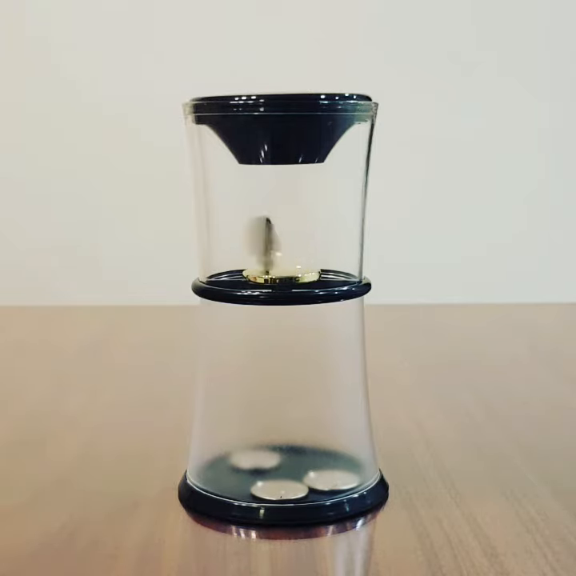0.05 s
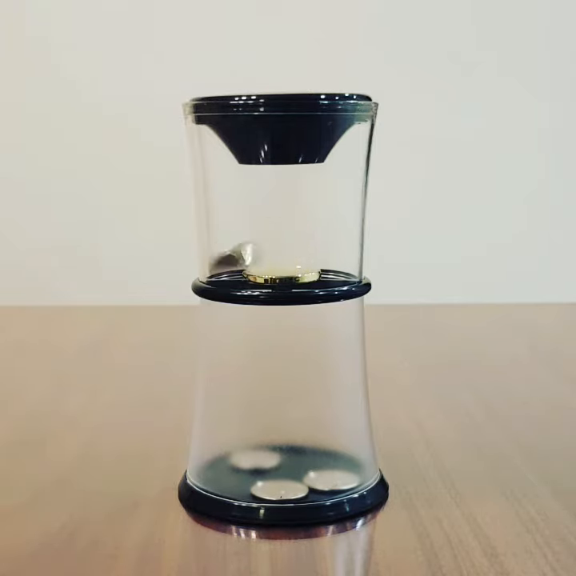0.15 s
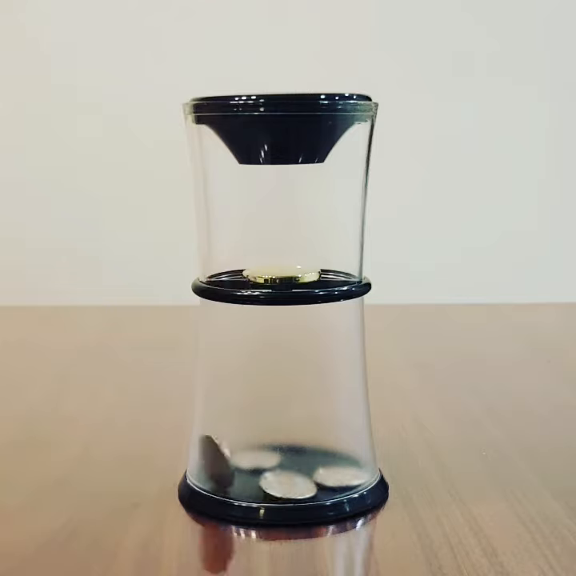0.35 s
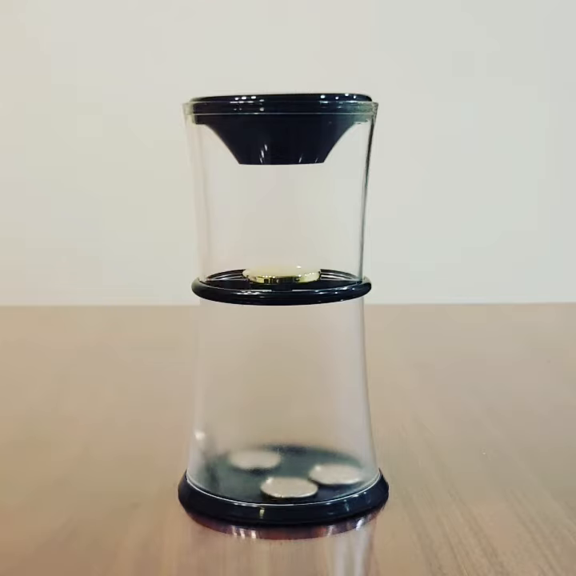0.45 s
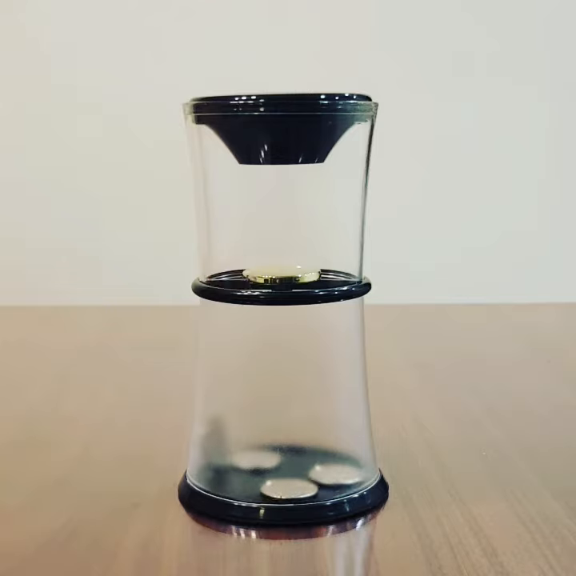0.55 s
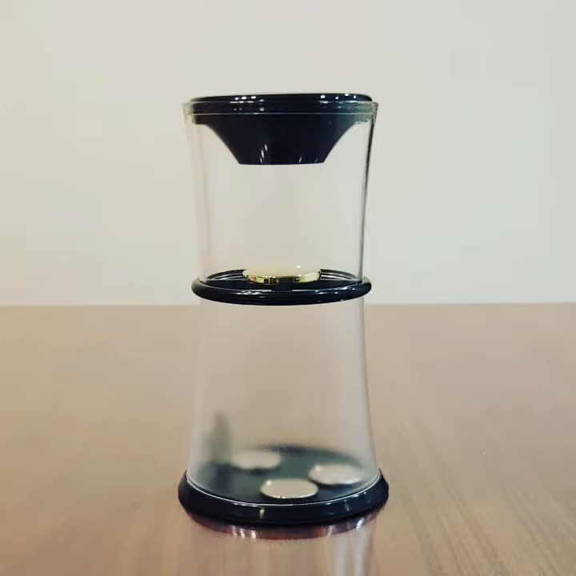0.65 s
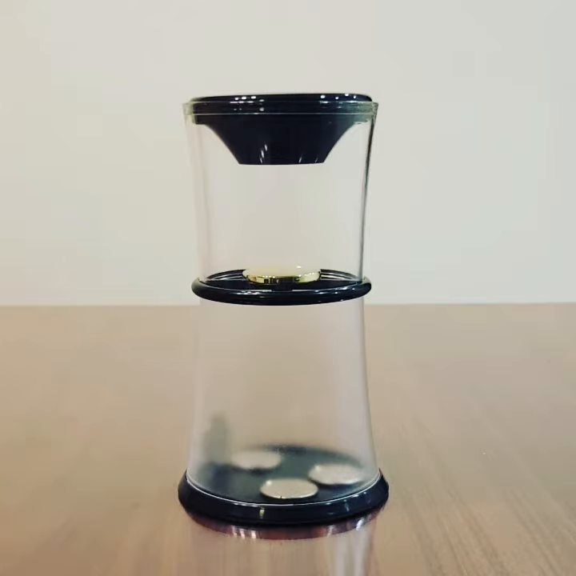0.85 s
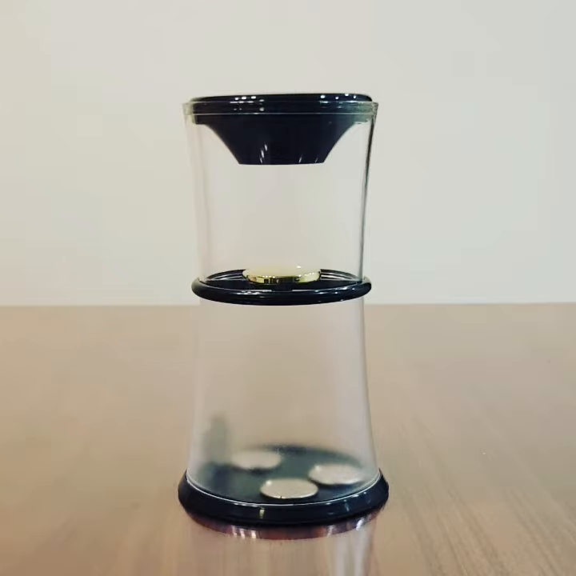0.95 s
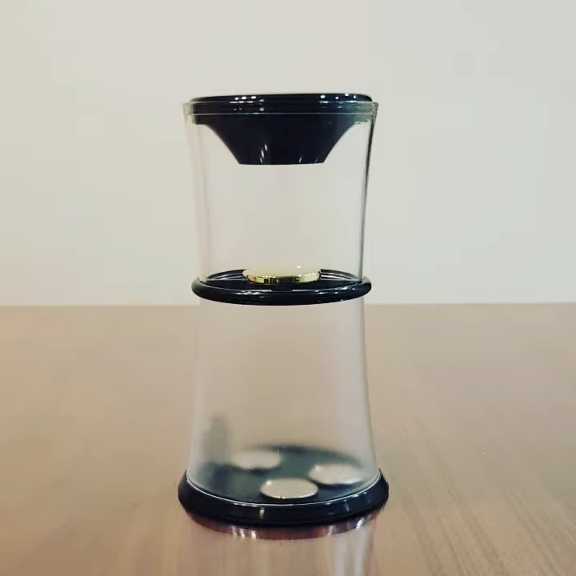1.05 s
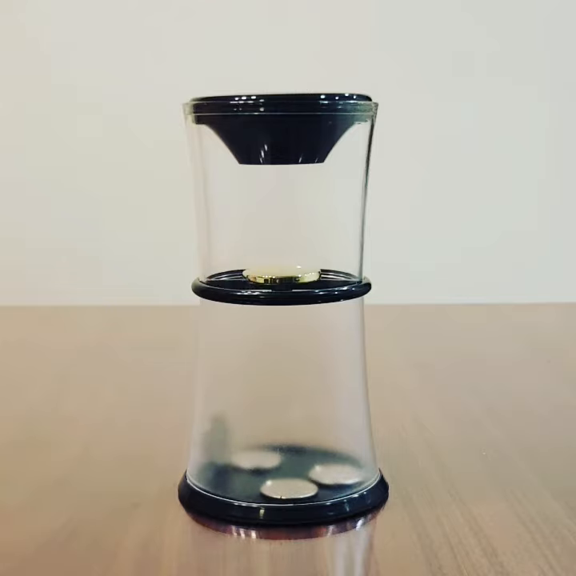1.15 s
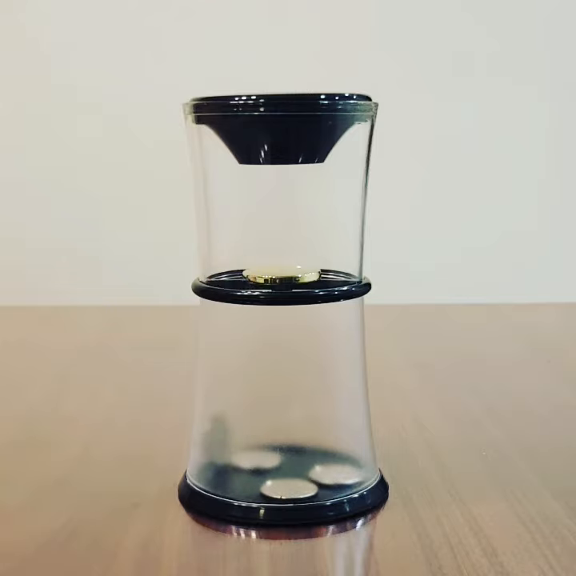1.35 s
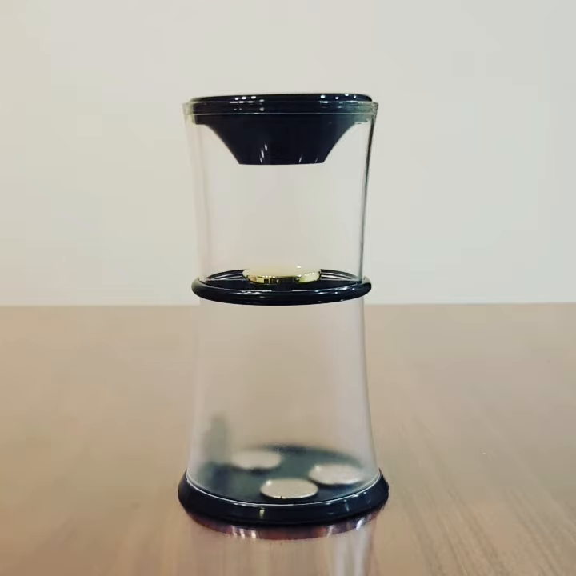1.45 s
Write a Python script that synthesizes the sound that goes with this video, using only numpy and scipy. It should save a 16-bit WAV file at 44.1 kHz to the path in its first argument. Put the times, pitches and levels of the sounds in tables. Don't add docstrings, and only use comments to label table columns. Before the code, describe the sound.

Coin drop in a clear plastic coin bank: brief wobble, quick scrape, sharp knocks, short settling rattle

```python
import sys
import numpy as np
from scipy import signal
from scipy.fft import rfft, irfft
from scipy.io import wavfile
from scipy.ndimage import uniform_filter1d

SR = 44100
rng = np.random.default_rng(int(sys.argv[2]) if len(sys.argv) > 2 else 0)


def dump(signal):
    limited = np.clip(np.atleast_2d(signal).T, -1, 1)
    pcm = np.round(limited * 32767).astype(np.int16)
    wavfile.write(sys.argv[1], SR, pcm)


def boost_factor(decibels):
    exponent = np.asarray(decibels, float) / 20
    return 10 ** exponent


N = 66150

# (frequency [Hz], level [dB])
TONE_LEFT_HZ_DB = [(25, -7.5), (70, 4), (135, 5), (300, -2), (700, -22.5), (3000, -35), (7000, -43.5)]
TONE_RIGHT_HZ_DB = [(25, -10.5), (70, 6.5), (135, 7), (300, -2), (1250, -22.5), (1950, -0.5), (2700, -28.5),
                    (7000, -45)]
# (frequency [Hz], likeness [0-1])
TONE_LIKENESS = [(60, .9), (150, .8), (300, .5), (1400, 0)]
# (frequency [Hz], t60 [s])
ROOM_HZ_T60_S = [(100, 0.65), (400, 0.6), (1000, 0.6), (3000, 0.48), (6500, 0.59), (10000, .45),
                 (16000, 0.36)]
# (frequency [Hz], gain [dB])
RIGHT_AIR_HZ_DB = [(100, -3.5), (400, 10.5), (1000, 3.5), (2000, 13.5), (2700, 4), (4000, 5.5),
                   (8000, -6.5), (15000, 0)]
# (frequency [Hz], gain [dB])
TABLE_HZ_DB = [(25, -20.5), (60, 0), (2800, 0.5), (3300, -17), (5000, -24.5), (8000, -47.5)]
# (time [s], level [dB], pitch [Hz])
FLEX_S_DB_HZ = [
    (0, -43, 450),
    (0.039, -52.5, 439.6),
    (0.046, -38.5, 392.7),
    (0.085, -44.5, 323.3),
    (0.103, -50.5, 290),
    (0.144, -57, 283.4),
    (0.164, -50, 290),
    (0.204, -47.5, 303),
    (.24, -70, 302),
]
# (time [s], contact force [dB])
WOBBLE_S_DB = [
    (0, -39.5),
    (.012, -55),
    (.0415, -57.5),
    (.044, -37),
    (.084, -48),
    (.09, -62.5),
    (.142, -61),
    (.144, -43.5),
    (.154, -59),
    (.2, -67),
]
# (time [s], contact force [dB])
SLIDE_S_DB = [(.19, -68.5), (.2, -48), (.216, -47), (.221, -33.5), (.238, -29), (.244, -38.5), (.264, -25),
              (.273, -37.5), (.3, -34.5), (.345, -38), (.36, -68)]
# (time [s], contact force [dB])
RATTLE_S_DB = [
    (.455, -74),
    (.465, -39.5),
    (.49, -32),
    (.53, -46.5),
    (.55, -49.5),
    (.64, -47.5),
    (.66, -84),
    (.74, -68),
]
# (time [s], body [dB], crack [dB], favoured pitch [Hz], crack tilt [dB/octave])
TRAY_HITS = [(.2585, -18.5, -39, 601, -3), (.2762, -9, -32.5, 2305, 3), (.2775, -10.5, -51, 690, -2),
             (.3030, -16, -55, 604.7, -3.5), (.308, -11.5, -30.5, 1788, -3), (.313, -22, -49, 650, -1.5),
             (.3325, -17.5, -55.5, 2337, -1.5), (.3355, -17.5, -65, 700, -10),
             (.2055, -30.5, -80.5, 690, -1), (.2205, -29, -75, 2421, -0.5), (.2335, -25, -71, 1300, 0.5),
             (.2455, -29.5, -71, 2400, -1), (.2820, -10.5, -60.5, 708, 2)]
BASE_HITS = [(.4115, -19, -33.5, 2700, 0.5), (.4362, -7.5, -27.5, 1200, -0.5), (.4430, -16.5, -64, 810, 2),
             (.4485, -27.5, -32.5, 1104, 3.5), (.452, -71, -25.5, 500, -1), (.4552, -12, -37.5, 2182, -9),
             (.4645, -21, -40.5, 2000, 6), (.4353, -8, -46, 3300, -3), (.487, -16.5, -54.5, 2302, -1.5),
             (.502, -31.5, -80, 1200, 12), (.554, -45, -41.5, 2510, 0), (.5795, -24, -44.5, 2130, 5),
             (.6005, -29.5, -42.5, 2060, -4.5), (.632, -35.5, -84, 2000, 7), (.684, -48, -76.5, 500, -16),
             (.708, -39.5, -66, 2000, -7), (.4462, -12, -61, 1135, -2), (.5215, -47, -73, 1200, 4),
             (.4805, -26.5, -60.5, 2116, -1)]
# (frequency [Hz], right [dB], left [dB], t60 [s])
ROCK_MODES = [(75, -4, -8, 0.093), (266, -11.5, -22, 0.12), (621, 0.5, -26.5, 0.051),
              (1200, -9, -19.5, 0.081), (1366, -4.5, -15.5, 0.04), (1600, -5, -22, 0.023),
              (1950, -14.5, -26, 0.0047), (2406, 2.5, -43.5, 0.01), (2800, -21.5, -45.5, 0.0072),
              (4000, -15.5, -24, 0.016)]
TRAY_MODES = [(71, -26, -29, .15), (290, -12.5, -22.5, 0.075), (450, 0.5, -21.5, 0.02),
              (602, -3.5, -28.5, 0.048), (690, -0.5, -21, 0.045), (790.5, -33.5, -27.5, 0.081),
              (1300, -6.5, -16.5, 0.037), (1610, 3, -19.5, 0.0085), (2000, -8, -22.5, 0.0301),
              (2400, 7, -23, 0.012), (2900, -17, -29.5, 0.0067), (4640, -10, -8, 0.0066)]
BASE_MODES = [(133.3, -19, -20.5, 0.7), (311.3, 1, -13.5, 0.055), (508.7, -6, -28, 0.042),
              (700, -2, -28.5, 0.05), (815, 2, -20.5, 0.036), (968, 2, -23, 0.018),
              (1131.2, 3, -11.5, 0.053), (1147.6, -21, -27, 0.27), (1501, -3, -38.5, 0.04),
              (1686, 2, -44, 0.022), (1986, -2.5, -28.5, 0.059), (2280, 5, -28.5, 0.012),
              (3027, 9, -19.5, 0.013)]
COIN_MODES = [(4460, 5, -2.5, .008), (7040, -7.5, -2, 0.0023), (10600, 0.5, -6.5, 0.017),
              (11000, -10.5, -5.5, 0.018)]
# (frequency [Hz], level [dB])
CRACK_HZ_DB = [(150, -21.5), (1150, 1), (2500, 3), (6800, -6), (8100, -13), (10000, -6), (13000, -3.5),
               (16000, -15)]


def read(points, hz):
    f, value = np.transpose(points)
    return np.interp(np.log(hz + 1), np.log(f + 1), value)


def evened(x):
    return x / np.sqrt(np.mean(x ** 2) + 1e-20)


def colour(x, points):
    log_gain = np.log(boost_factor(read(points, np.fft.rfftfreq(4096, 1 / SR))))
    circle = np.concatenate([log_gain, log_gain[-2:0:-1]])
    taps = np.fft.ifft(np.exp(np.conj(signal.hilbert(circle)))).real[:2048]
    return signal.fftconvolve(x, taps)[:len(x)]


def room_tone():
    level_db, lift_db, sink_s = -68.5, 14.5, 1
    hiss_hz, hiss_db = 10800, -35.5
    frames, hz = N // 512 + 6, np.fft.rfftfreq(2048, 1 / SR)
    a, b, c, d = rng.standard_normal((frames, 1025, 4)).T
    left, other = a + 1j * b, c + 1j * d
    same = np.clip(read(TONE_LIKENESS, hz), 0, 1)[:, None]
    right = same * left + np.sqrt(1 - same ** 2) * other
    hiss = boost_factor(hiss_db) / (1 + (hiss_hz / (hz + 1)) ** 8)
    left_gain = (boost_factor(read(TONE_LEFT_HZ_DB, hz)) + hiss)[:, None]
    right_gain = (boost_factor(read(TONE_RIGHT_HZ_DB, hz)) + hiss)[:, None]
    spectra = np.array([left * left_gain, right * right_gain])
    tone = evened(signal.istft(spectra, nperseg=2048, noverlap=1536)[1][:, :N])
    t = np.arange(N) / SR
    return tone * boost_factor(level_db + lift_db * np.exp(-(t / sink_s) ** 2))


def room(x):
    gap_s, rise_s = 0.0053, 0.0021
    taps = np.zeros((2, SR))
    slots = np.arange(0, SR - 12, 12)
    at = slots + rng.integers(0, 12, (2, len(slots)))
    np.put_along_axis(taps, at, rng.choice([-1., 1.], at.shape), 1)
    hz, t, z = signal.stft(taps, SR, nperseg=256)
    decay = boost_factor(-60 * t / read(ROOM_HZ_T60_S, hz)[:, None])
    tail = signal.istft(z * decay, SR, nperseg=256)[1]
    tail = tail * np.clip((np.arange(tail.shape[1]) / SR - gap_s) / rise_s, 0, 1)
    return signal.fftconvolve(x[None], tail / np.linalg.norm(tail[0]), axes=1)[:, :N]


def hum():
    hz, level_db, t60_s = 4400, -81.5, .35
    t = np.arange(N) / SR
    slow = uniform_filter1d(rng.standard_normal((2, 2, N)), 250, axis=2)
    wave = slow[0] * np.cos(2 * np.pi * hz * t) + slow[1] * np.sin(2 * np.pi * hz * t)
    return evened(wave) * boost_factor(level_db - 60 * (t / t60_s) ** 2)


def flex():
    width_hz, left_db = 29, -20
    s, db, hz = np.transpose(FLEX_S_DB_HZ)
    t, pole = np.arange(N) / SR, np.exp(-np.pi * width_hz / SR)
    noise = [1, 1j] @ rng.standard_normal((2, N))
    slow = signal.lfilter([1], np.convolve([1, -pole], [1, -pole]), noise)
    cycles = np.cumsum(np.interp(t, s, hz)) / SR
    wave = evened((slow * np.exp(2j * np.pi * cycles)).real)
    wave = 2 * wave * boost_factor(np.interp(t, s, db)) * (t < s[-1])
    return wave * boost_factor(np.array([[left_db], [0]]))


def contact(force, per_s, uneven_db):
    s, db = np.transpose(force)
    t = np.arange(N) / SR
    struck = rng.random(N) < per_s / SR
    size = boost_factor(uneven_db * np.minimum(rng.exponential(1, N), 4))
    slips = struck * size * rng.choice([-1., 1.], N)
    return evened(slips) * boost_factor(np.interp(t, s, db)) * (t < s[-1])


def ring(modes, gains, phases, stretch):
    hz, right_db, left_db, t60_s = np.transpose(modes)[:, :, None]
    t = np.arange(SR // 2) / SR
    onset = np.minimum(t * np.minimum(hz, 900), 1)
    fade = gains[:, None] * boost_factor(-60 * t / t60_s) * onset
    turn = 2 * np.pi * hz * stretch[:, None] * t
    apart = phases[1] * np.minimum(hz[:, 0] / 500, 1.5)
    left = (boost_factor(left_db) * fade * np.sin(turn + phases[0][:, None])).sum(0)
    right = (boost_factor(right_db) * fade * np.sin(turn + (phases[0] + apart)[:, None])).sum(0)
    return np.array([left, right])


def drive(slips, modes):
    count = len(modes)
    shape = ring(modes, np.ones(count), rng.standard_normal((2, count)), np.ones(count))
    return signal.fftconvolve(slips[None], shape / np.linalg.norm(shape[1]), axes=1)[:, :N] * 2


def knocks(hits, modes):
    favour_db, floor_db = -10, -17.5
    spread_db, detune, shared = 1.5, .008, .3
    crack_t60_s, crack_rise_s = .012, 0.00058
    body, air, hz = np.zeros((2, N)), np.zeros((2, N)), np.array(modes)[:, 0]
    luck = rng.standard_normal((len(hits), 4, len(modes)))
    fizz = rng.standard_normal((len(hits), 3, 1500))
    t, bins_hz = np.arange(1500) / SR, np.fft.rfftfreq(1500, 1 / SR)
    fade = boost_factor(-30 * t / crack_t60_s) * np.minimum(t / crack_rise_s, 1)
    for (s, body_db, crack_db, favour_hz, tilt_db), row, noise in zip(hits, luck, fizz):
        at = round(s * SR)
        off_db = np.maximum(favour_db * np.log2(hz / favour_hz) ** 2, floor_db)
        gains = boost_factor(body_db + off_db + spread_db * row[0])
        sound = ring(modes, gains, row[1:3], 1 + detune * row[3])[:, :N - at]
        body[:, at:at + sound.shape[1]] += sound
        lumpy = rfft((shared * noise[0] + noise[1:]) * fade)
        flat = lumpy / abs(lumpy) * np.linalg.norm(fade)
        crack = irfft(flat * boost_factor(tilt_db * np.log2((bins_hz + 300) / 5000)))
        air[:, at:at + len(t)] += boost_factor(crack_db + 15.5) * crack * fade
    return body, air


def scene():
    scrape_air_db, coin_db = -23, -30.5
    room_db, body_air_db, fall_room_db = 0.5, -9, -4
    t = np.arange(N) / SR
    slips = contact(SLIDE_S_DB, per_s=3600, uneven_db=1.5)
    bite = slips * boost_factor(np.interp(t, [.212, .222, .262, .29], [-31, -9.5, 3, -13]))
    tray, tray_air = knocks(TRAY_HITS, TRAY_MODES)
    base, base_air = knocks(BASE_HITS, BASE_MODES)

    cracks = tray_air + base_air + boost_factor(scrape_air_db) * bite
    cracks = np.array([colour(x, CRACK_HZ_DB) for x in cracks])
    cracks = cracks + boost_factor(coin_db) * drive(bite, COIN_MODES)

    wobble = drive(contact(WOBBLE_S_DB, per_s=4800, uneven_db=-4.5), ROCK_MODES)
    rattle = drive(contact(RATTLE_S_DB, per_s=700, uneven_db=0.0), BASE_MODES[1:])
    body = wobble + drive(slips, TRAY_MODES) + tray + base + rattle
    body = np.array([colour(x, TABLE_HZ_DB) for x in body]) + flex()

    send = boost_factor(fall_room_db * (t < BASE_HITS[1][0]))
    air = cracks + boost_factor(room_db) * room(send * (cracks[0] + boost_factor(body_air_db) * body[0]))
    air = np.array([air[0], colour(air[1], RIGHT_AIR_HZ_DB)])
    return body + air + room_tone() + hum()


def roll_off(x):
    return signal.sosfilt(signal.butter(12, 16800, fs=SR, output="sos"), x)


def record(dry):
    edge = signal.firwin(401, 15950, window=("kaiser", 7), fs=SR)
    mix = signal.oaconvolve(np.clip(dry, -1, 1), edge[None], "same")
    return roll_off(mix)


dry = scene()
out = record(dry)
dump(out)
```